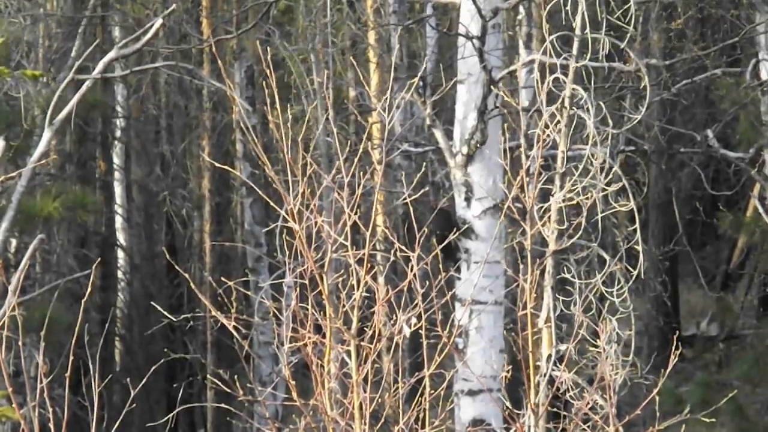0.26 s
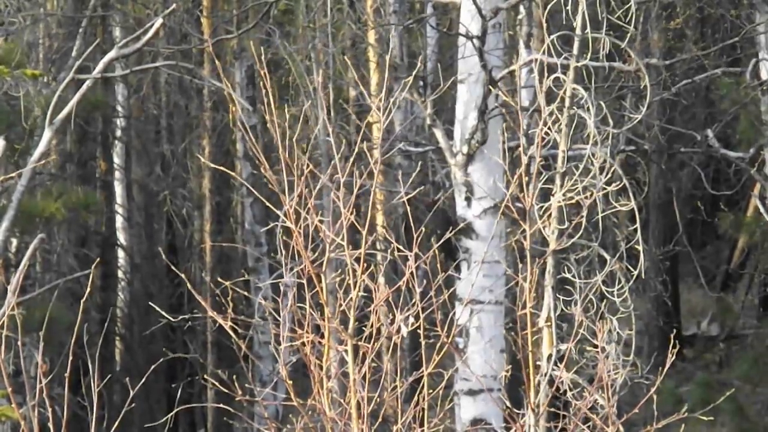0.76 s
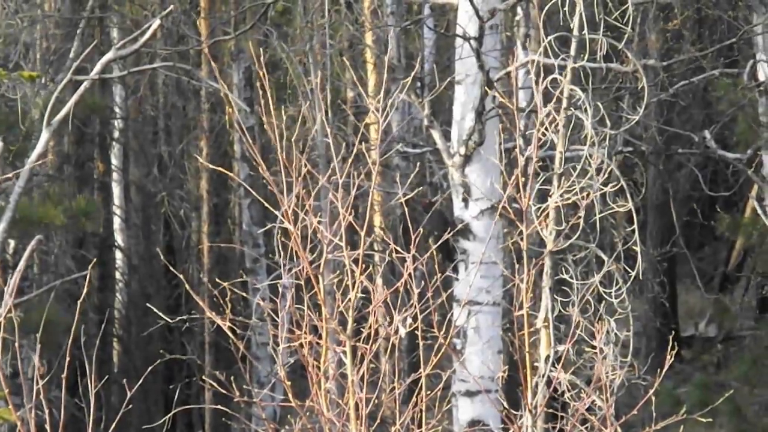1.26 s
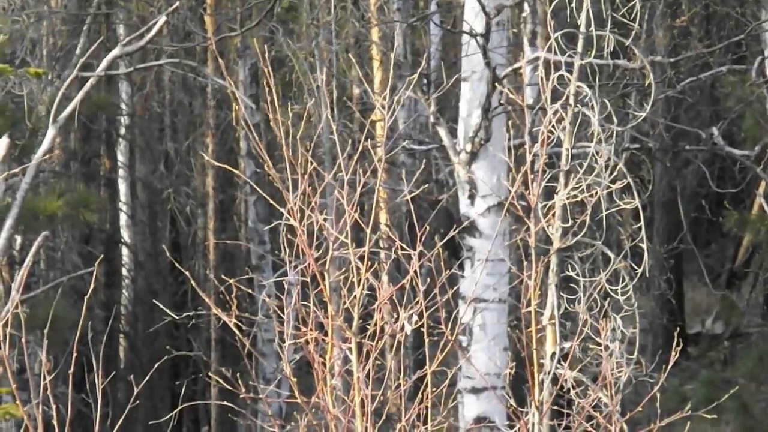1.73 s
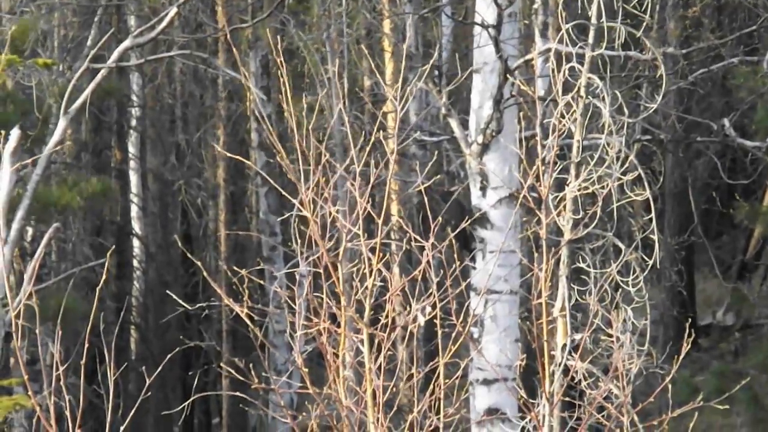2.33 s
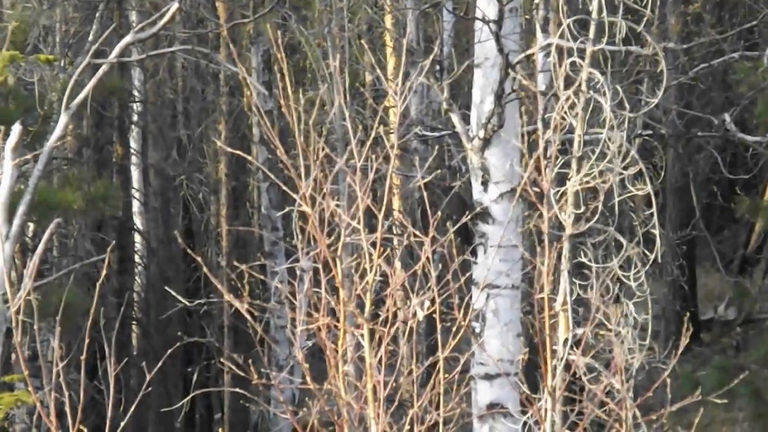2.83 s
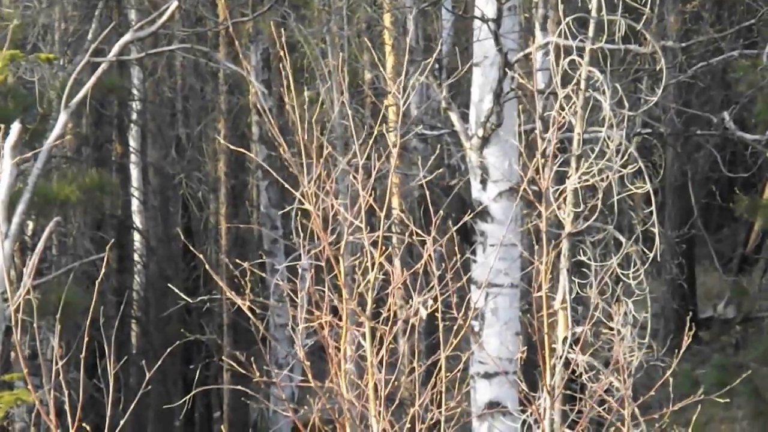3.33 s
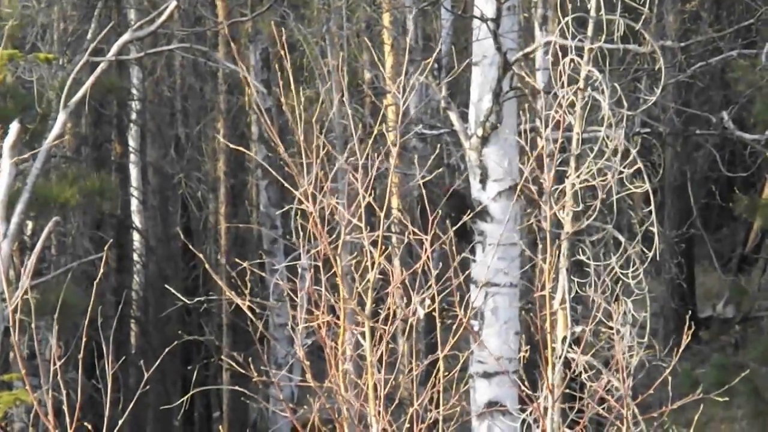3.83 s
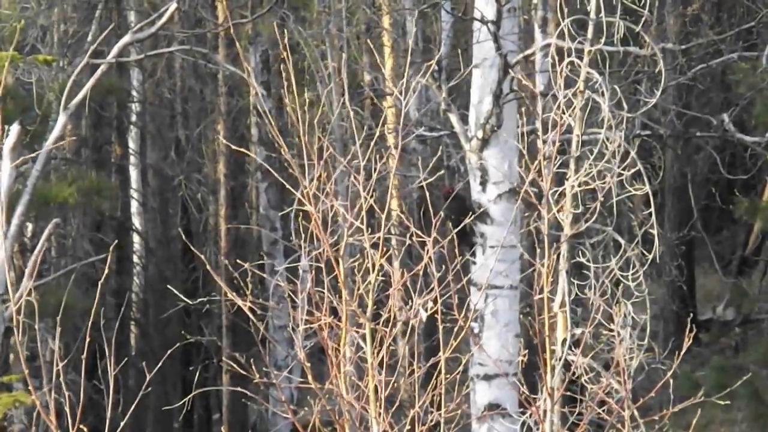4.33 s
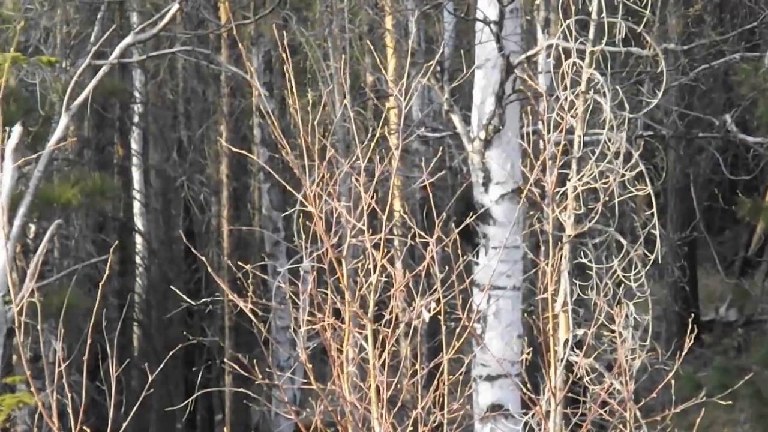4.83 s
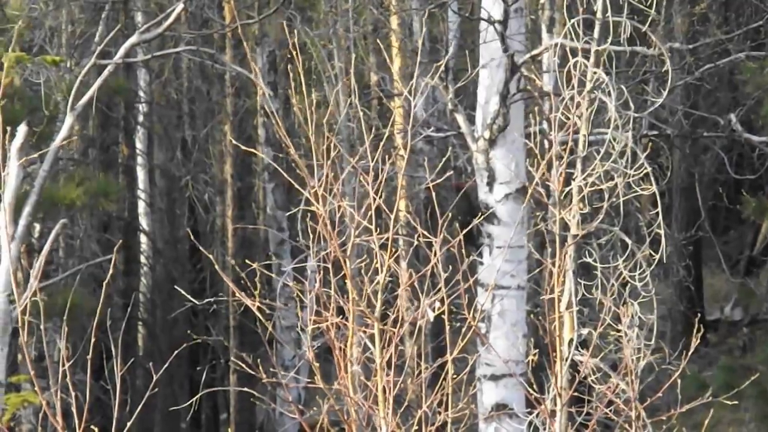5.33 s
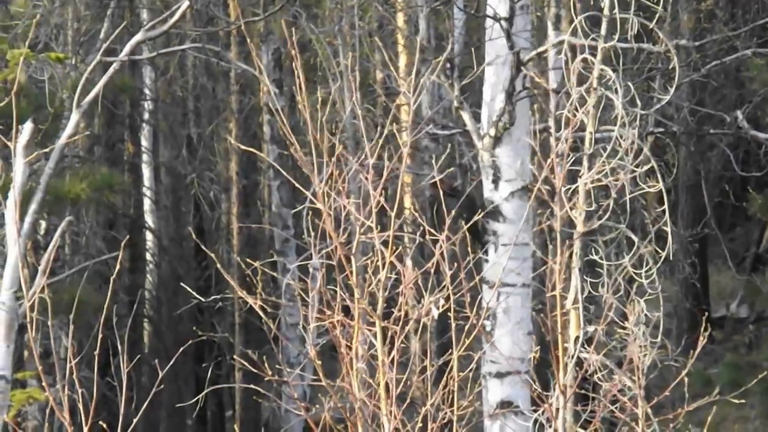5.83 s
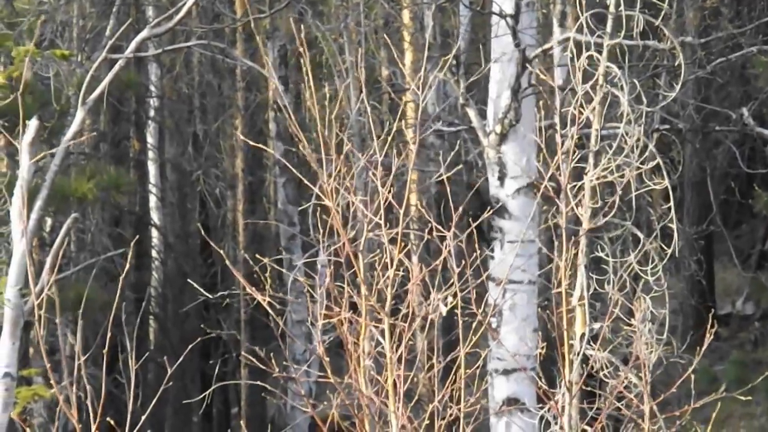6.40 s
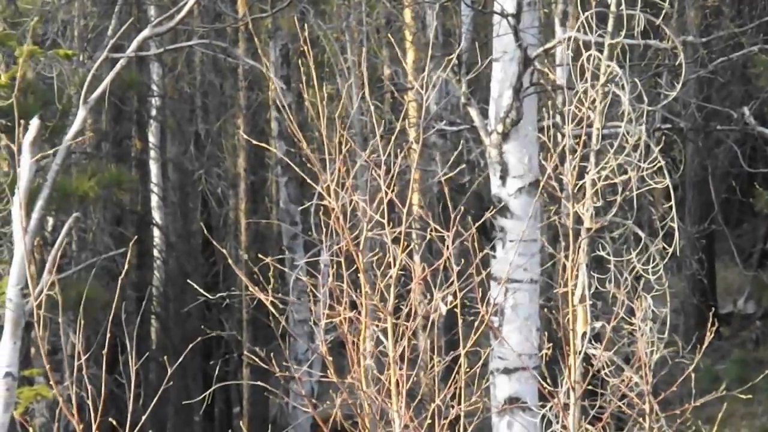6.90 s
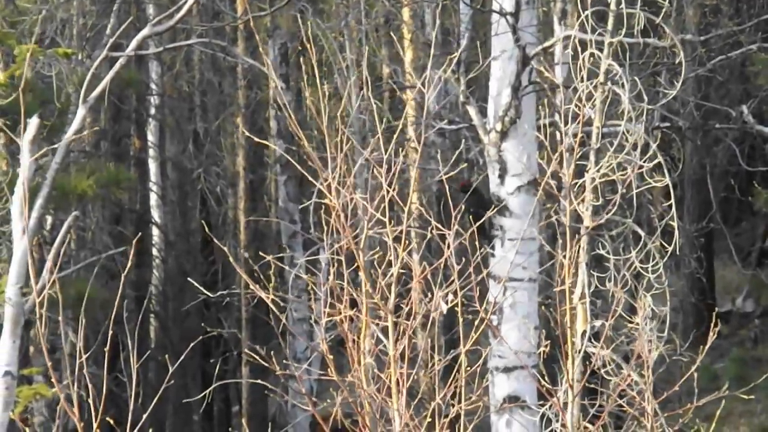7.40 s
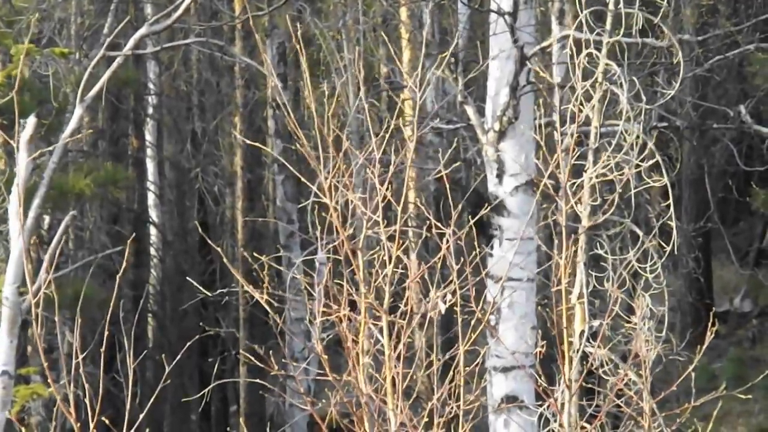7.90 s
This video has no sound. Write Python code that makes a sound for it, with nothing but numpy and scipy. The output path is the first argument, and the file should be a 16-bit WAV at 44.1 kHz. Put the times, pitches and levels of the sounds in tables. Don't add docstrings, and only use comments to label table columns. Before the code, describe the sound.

In a still forest, a woodpecker calls almost at once: a tiny pip, sharp yelp and long mewing whistle. Faint small-bird chirps surround it. Four tiny camera-drive buzzes follow, then a second, longer call echoes off the trunks. Later the small bird sings four falling notes, growing clearer. The camera microphone adds soft hiss, rapid faint ticking, low wind thumps and a few dry snaps.

```python
import sys
import numpy as np
from scipy import signal
from scipy.fft import rfft, irfft
from scipy.io import wavfile
from scipy.ndimage import uniform_filter1d

SR = 44100
rng = np.random.default_rng(int(sys.argv[2]) if len(sys.argv) > 2 else 0)


def store_wav(level_fs):
    pcm = np.round(np.clip(np.atleast_2d(level_fs), -1, 1) * 32767)
    wavfile.write(sys.argv[1], SR, pcm.T.astype(np.int16))


def gain_from_decibels(decibels):
    exponent = np.asarray(decibels, float) / 20
    return 10 ** exponent


N = 359415

# time_s, pitch_hz, level_db
NOTE_SHAPE = [(-.055, 4790, -34), (-.03, 4725, -14), (0, 4565, 0), (.012, 4375, -1), (.033, 3865, -2),
              (.05, 3670, -6), (.08, 3530, -1), (.14, 3450, -3), (.24, 3365, -6)]
# start_s, pitch_hz, sag_db
PIP_ONSETS = [
    (.2436, 1288, -8),
    (3.645, 1170, -.1),
]


def evened(x):
    return x / np.sqrt(np.mean(x ** 2) + 1e-20)


def read(points, hz):
    point_hz, value = np.transpose(points)
    return np.interp(np.log(hz + 1), np.log(point_hz + 1), value)


def add(mix, start_s, sound):
    part = mix[round(start_s * SR):][:len(sound)]
    part += sound[:len(part)]


def played(rows, smooth_s):
    row_s, *columns = np.transpose(rows)
    t = np.arange(row_s[0], row_s[-1], 1 / SR)
    size = int(smooth_s * SR) + 1
    return [uniform_filter1d(np.interp(t, row_s, c), size, mode="nearest") for c in columns]


def slow_noise(count):
    return evened(uniform_filter1d(uniform_filter1d(rng.standard_normal(count), 500), 500))


def ring(x, hz, width_hz):
    turn = np.exp(2j * np.pi * hz * np.arange(len(x)) / SR)
    r = np.exp(-np.pi * width_hz / SR)
    return 2 * (turn * signal.lfilter([1 - r], [1, -r], x / turn)).real


def hiss():
    # pitch_hz, level_db_per_hz
    floor = [(18, -29), (30, 5), (53, -14.5), (145, -22), (499, -31), (632, -33), (937, -37), (1010, -39),
             (1130, -31.5), (1280, -32), (1390, -30.5), (2230, -32.5), (2820, -32.5), (3670, -41.5),
             (16000, -53)]
    # pitch_hz, width_hz, lift_db
    body = [(940, 200, 7.5), (1155, 51, 6), (1408.6, 24.4, 11), (2840, 188, 11.5), (2460, 50, 4.5),
            (3290, 450, 7.5), (3970, 240, 4), (4074, 68, 6)]
    frames, hz = N // 512 + 5, np.fft.rfftfreq(2048, 1 / SR)
    real, imag, patches = rng.standard_normal((frames, 1025, 3)).T
    patches = evened(uniform_filter1d(uniform_filter1d(patches, 20, 0), 8, 1))
    colour_db = read(floor, hz)
    colour_db = colour_db + sum(db / (1 + (2 * (hz - f) / w) ** 2) for f, w, db in body)
    z = (real + 1j * imag) * gain_from_decibels(colour_db[:, None] + 0.35 * patches) * (hz > 45)[:, None]
    return gain_from_decibels(-47.5) * evened(signal.istft(z, nperseg=2048, noverlap=1536)[1][:N])


def lumps(colour, span):
    hz = np.fft.rfftfreq(N, 1 / SR)
    spectrum = rfft(rng.standard_normal(N)) * gain_from_decibels(read(colour, hz)) * (hz > 1)
    x = evened(irfft(spectrum, N))
    return x / np.sqrt(uniform_filter1d(x ** 2, int(span)) + 0.066)


def wind():
    # centre_s, half_width_s, heave_db, buffet_db
    gusts = [(.43, 0.033, -40, -60), (.82, 0.1, -32, -45), (2.55, 0.29, -41, -54), (3.13, 0.1, -28, -51),
             (3.36, 0.023, -34, -58), (4.17, 0.094, -29.5, -35), (4.34, 0.076, -35.5, -50),
             (5.2, 0.056, -46, -41.5), (5.53, 0.044, -26, -50), (5.76, 0.077, -34.5, -44),
             (6.04, 0.06, -29.5, -52), (6.92, 0.15, -49, -44.5), (7.31, 0.035, -40, -45),
             (7.84, 0.078, -25, -31), (8.07, 0.14, -28, -59)]
    # heave_db, buffet_db
    calm_db = [-44.5, -50.5]
    # pitch_hz, level_db_per_hz
    heave_colour = [(2, -1.5), (5, -1.5), (12, -1), (25, -6.5), (40, -46), (80, -82.5)]
    # pitch_hz, level_db_per_hz
    buffet_colour = [(12, -30), (26, 6), (45, -4.5), (70, -11.5), (120, -54), (200, -67)]
    t = np.arange(0, N + 64, 64) / SR
    power = gain_from_decibels(np.array(calm_db))[:, None] ** 2
    for centre_s, half_width_s, *db in gusts:
        swell = np.exp(-2 * ((t - centre_s) / half_width_s) ** 2)
        power = power + np.outer(gain_from_decibels(np.array(db)) ** 2, swell)
    heave, buffet = (np.interp(np.arange(N) / SR, t, np.sqrt(p)) for p in power)
    return lumps(heave_colour, 11000) * heave + lumps(buffet_colour, 3900) * buffet


def ticks():
    edges = [
        (0, 1),
        (24.6, -1),
        (30.3, 1),
        (54.9, -1),
    ]
    start_s, rate_hz, level_db = .013919, 29.4954, -43
    train, n = np.zeros(N), np.arange(-8, 72)
    at = np.round(np.arange(start_s, N / SR - .01, 1 / rate_hz) * SR).astype(int)
    train[at - 8] = gain_from_decibels(level_db + 1.5 * rng.standard_normal(len(at)))
    spikes = sum(sign * np.exp(-((n - step) / 0.91) ** 2) for step, sign in edges)
    return signal.lfilter([1, -1], [1, -.7], signal.oaconvolve(train, spikes)[:N])


def whine():
    return gain_from_decibels(-81) * np.sqrt(2) * np.sin(2 * np.pi * 15721 * np.arange(N) / SR)


def small_bird(level_db, swell_db_per_s, length_s):
    hz, db = played(NOTE_SHAPE, smooth_s=.014)
    t = NOTE_SHAPE[0][0] + np.arange(len(hz)) / SR
    fade = np.clip((length_s - t) / 0.0093, 0, 1)
    level = np.sqrt(2) * gain_from_decibels(db + level_db + swell_db_per_s * t)
    return level * np.sin(2 * np.pi * np.cumsum(hz) / SR) * fade


def pip(start_s, hz, sag_db, until_s, levels_db):
    rise_s = .002
    t = np.arange(0, until_s - start_s, 1 / SR)
    db = -30 * np.clip(1 - t / rise_s, 0, 1) + sag_db * (t / t[-1]) ** 2
    return np.array([hz + 0 * t] + [level + db for level in levels_db])


def yelp(rows, upper_db):
    hz, effort, beak = played(rows, smooth_s=.0005)
    third = effort - 8.5 + .3 * beak
    upper = upper_db + .06 * (hz - 1500)
    return np.array([hz, effort, effort + beak, third, upper])


def mew(start_s, entry, top_s, end_s, top_hz, sag_hz, levels_db):
    slack_db_per_hz = [-0.018, 0.089, -0.021, -0.08]
    tire_db_per_s = [4, 4.5, -8.5, 8]
    end_db = [-20, -48, -18, -22]
    arch_s, arch_power, settle_s = .25, 2.3, .018
    drop_hz, drop_s, fade_s = 240, .017, .024
    t = np.arange(start_s, end_s, 1 / SR)
    sag = sag_hz * abs((t - top_s) / arch_s) ** arch_power
    hz = top_hz - sag - drop_hz * np.exp((t - end_s) / drop_s)
    fade = np.exp((t - end_s) / fade_s)
    laws = zip(levels_db, slack_db_per_hz, tire_db_per_s, end_db)
    partials = [db + slack * sag + tire * (t - top_s) + drop * fade for db, slack, tire, drop in laws]
    held = np.array([hz] + partials)
    return held + (entry - held[:, 0])[:, None] * np.exp(-((t - start_s) / settle_s) ** 2)


def voice(k):
    # time_s, pitch_hz, effort_db, beak_db
    yelps = [
        [(.2515, 1320, -48, 22), (.2675, 1490, -43, 15), (.2712, 1470, -41, 26), (.2736, 1635, -34, 22),
         (.277, 1655, -34, 21), (.2805, 1605, -35, 21), (.2825, 1465, -39, 22), (.287, 1428, -38, 23),
         (.297, 1468, -38.5, 20)],
        [(3.6515, 1350, -45, -3), (3.654, 1445, -37, -7), (3.668, 1580, -30, -20), (3.671, 1585, -30, -7),
         (3.675, 1530, -30, -3), (3.6788, 1655, -28, 12), (3.6855, 1640, -28, 11), (3.688, 1510, -32, 8),
         (3.7, 1495, -35, 3)],
    ]
    # top_s, end_s, top_hz, sag_hz
    mews = [
        (.595, .819, 1469, 47),
        (4.04, 4.336, 1486, 33),
    ]
    # first_db, second_db, third_db, upper_db
    pip_db = [(-52, -16, -48, -54), (-52, -43.5, -41.5, -56)]
    # first_db, second_db, third_db, upper_db
    mew_db = [(-38, -31.5, -40.5, -57.5), (-40, -31.5, -41.5, -64.5)]
    upper_yelp_db = [-57, -66]
    # time_s, change_db, half_width_s
    second_partial_swings = [
        (.2514, -16, .0007),
        (.2705, 8, .001),
        (.2724, -16, .0005),
        (.282, -4, .0007),
        (.2845, 10, .0016),
        (.295, -4, .002),
        (.304, 4, .005),
        (3.6768, -6, .001),
        (3.6875, -8, .0008),
        (3.69, 7, .0013),
    ]
    flutter_db = [1, 3.5]
    rows = yelps[k]
    yelp_s, mew_s = rows[0][0], rows[-1][0]
    opening = yelp(rows, upper_yelp_db[k])
    lead = pip(*PIP_ONSETS[k], yelp_s, pip_db[k])
    whistle = mew(mew_s, opening[:, -1], *mews[k], mew_db[k])
    track = np.hstack([lead, opening, whistle])
    t = PIP_ONSETS[k][0] + np.arange(track.shape[1]) / SR
    swings = sum(db * np.exp(-((t - s) / width) ** 2) for s, db, width in second_partial_swings)
    track = uniform_filter1d(track, 23, mode="nearest") + np.outer([0, 0, 1, 0, 0], swings)
    track = track + np.outer([0, .2, 0, .3, 1], flutter_db[k] * slow_noise(len(t)))
    push = np.clip((mew_s - t) / .03 + .9, 0, 1)
    return track, swings, push


def woodpecker(k):
    # multiple, level_db
    upper = [
        [(4, -17), (5, 0), (6, -20), (7, -8)],
        [(4, -15), (5, 0), (6, -20), (7, -13)],
    ]
    # pitch_hz, level_db
    beak = [
        [(4600, -3), (5800, 2), (6600, -2), (8200, -1), (9200, -4), (10000, 1), (11500, -14)],
        [(4700, 9), (6100, 3), (6700, -8), (8200, -5), (9200, -8), (10000, 4), (11500, -14)],
    ]
    # whistle_db, yelp_db
    scatter = [
        (-13, -17.5),
        (-13.5, -12.5),
    ]
    track, swings, push = voice(k)
    hz, *low_db, upper_db = track
    hz = hz * (1 + .004 * uniform_filter1d(rng.standard_normal(len(hz)), 300))
    phase = 2 * np.pi * np.cumsum(hz) / SR
    levels = list(enumerate(low_db, 1))
    for multiple, db in upper[k]:
        levels.append((multiple, upper_db + db + push * (read(beak[k], multiple * hz) - db)))
    call = np.sqrt(2) * sum(gain_from_decibels(db) * np.sin(multiple * phase) for multiple, db in levels)
    call *= signal.windows.tukey(len(hz), .002)
    whistle_db, yelp_db = scatter[k]
    sent_db = whistle_db + push * (yelp_db - whistle_db) - np.maximum(swings, 0)
    return call, call * gain_from_decibels(sent_db)


def trunks(x):
    # pitch_hz, t60_s
    decay = [(1000, 2.2), (3000, 1.4), (5000, 1.1), (10000, 0.37)]
    # pitch_hz, level_db
    thrown_back = [(1500, -5), (2500, -4), (2900, -1), (3350, 0), (4400, -9), (5000, -9), (5800, 5),
                   (9000, 2)]
    taps = np.zeros(SR)
    at = np.arange(500, SR - 20, 20)
    sizes = rng.standard_normal(len(at)) * (1 + gain_from_decibels(7) * np.exp(-at / SR / .08))
    taps[at + rng.integers(0, 20, len(at))] = sizes
    hz, t, z = signal.stft(taps, SR, nperseg=256)
    tail_db = read(thrown_back, hz)[:, None] - 60 * t / read(decay, hz)[:, None]
    tail = signal.istft(z * gain_from_decibels(tail_db), SR, nperseg=256)[1]
    x = x * (.9 + .45 * slow_noise(N))
    return signal.fftconvolve(x, tail / np.linalg.norm(tail))[:N]


def snap(hz):
    t = np.arange(600) / SR
    return evened(ring(rng.standard_normal(len(t)), hz, 2500)) * gain_from_decibels(-60 * t / 0.034)


def buzz(length_s, low_db, tilt_db_per_octave):
    # pitch_hz, width_hz, level_db
    shell = [(295, 40, -14), (513, 61, -3), (880, 22, -5.5), (1110, 70, 0.5), (1377, 41, 3.5),
             (2380, 73, 0.5), (2950, 200, -17)]
    t = np.arange(2500) / SR
    push = np.clip(t / .004, 0, 1) * np.clip((length_s - t) / .012, 0, 1)
    jolts = rng.standard_normal(len(t)) * (1 + (t * 270 % 1 < .3)) * push
    jolts = signal.sosfilt(signal.butter(4, 2800, fs=SR, output="sos"), jolts)
    sound = np.zeros(len(t))
    for k, (hz, width_hz, db) in enumerate(shell):
        mode_db = db + tilt_db_per_octave * np.log2(hz / 800) + low_db * (k == 0)
        sound += gain_from_decibels(mode_db) * evened(ring(ring(jolts, hz, 6 * width_hz), hz, width_hz))
    return sound / abs(sound).max()


def scene():
    # knee_s, level_db, swell_db_per_s, length_after_knee_s
    bird_notes = [
        (.215, -62, -30, .055),
        (.607, -60, 25, .15),
        (1.0, -60.5, 10, .1),
        (6.413, -60, 60, .215),
        (6.792, -50, 30, .222),
        (7.174, -42, -20, .2),
        (7.545, -44, -15, .2),
    ]
    # start_s, level_db, pitch_hz
    cracks = [
        (.2685, -50, 7000),
        (.2825, -47, 7000),
        (.288, -53, 6000),
        (3.6465, -46, 4000),
        (3.673, -54, 6200),
        (3.687, -54, 6200),
        (3.697, -57, 7500),
    ]
    # start_s, level_db, pitch_hz
    snaps = [
        (4.457, -56, 5090),
        (7.24, -58.5, 5300),
        (8.105, -49, 4160),
    ]
    # start_s, peak_db, length_s, lowest_mode_db, tilt_db_per_octave
    buzzes = [
        (2.597, -30, 0.017, 12.5, -3.5),
        (2.705, -33.5, 0.022, 4, -8),
        (2.793, -29.5, 0.018, 4, -4),
        (2.908, -33, 0.0188, 13, -3.5),
    ]
    birds, scattered = np.zeros(N), np.zeros(N)
    near = hiss() + wind() + ticks() + whine()
    for knee_s, *shape in bird_notes:
        add(birds, knee_s + NOTE_SHAPE[0][0], small_bird(*shape))
    scattered += gain_from_decibels(-17) * birds
    for k, (start_s, *_) in enumerate(PIP_ONSETS):
        call, sent = woodpecker(k)
        add(birds, start_s, call)
        add(scattered, start_s, sent)
    for start_s, db, hz in cracks + snaps:
        add(near, start_s, gain_from_decibels(db) * snap(hz))
    for start_s, db, *shape in buzzes:
        add(near, start_s, gain_from_decibels(db) * buzz(*shape))
    return (birds + trunks(scattered) + near)[None]


def roll_off(x):
    return signal.sosfilt(signal.butter(12, 16130, fs=SR, output="sos"), x)


def record(dry):
    edge = signal.firwin(1023, 15760, window=("kaiser", 9), fs=SR)
    return roll_off(signal.oaconvolve(dry, edge[None], "same"))


dry = scene()
out = record(dry)
store_wav(out)
```